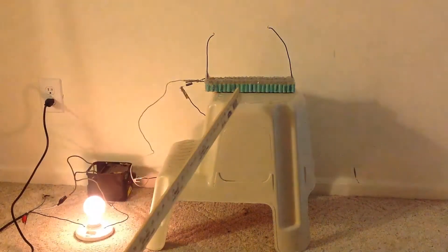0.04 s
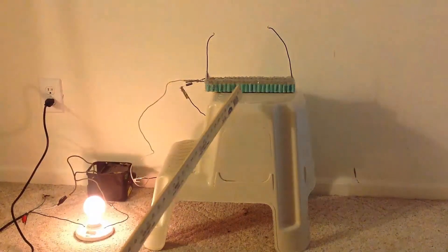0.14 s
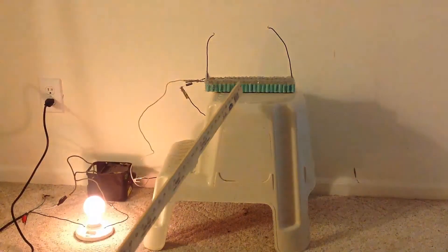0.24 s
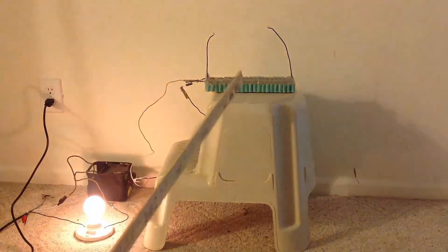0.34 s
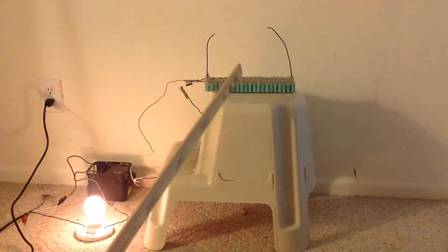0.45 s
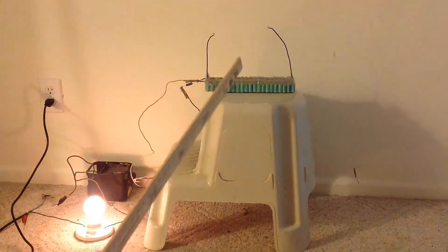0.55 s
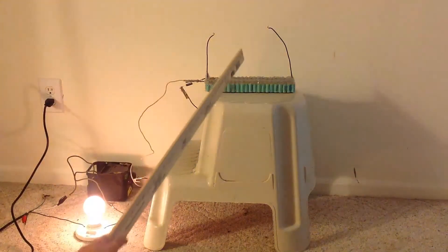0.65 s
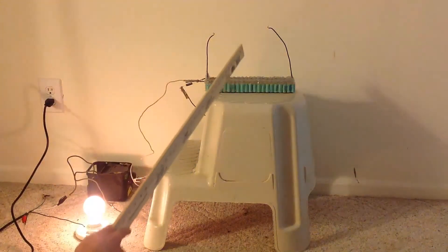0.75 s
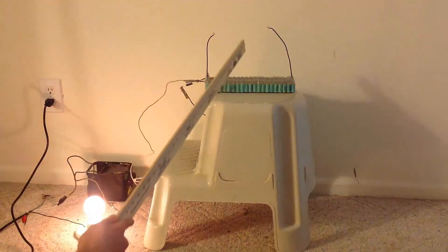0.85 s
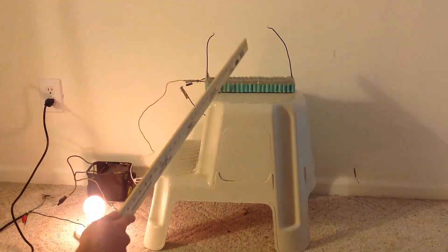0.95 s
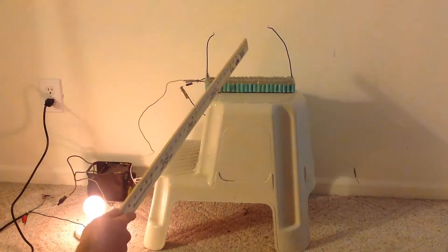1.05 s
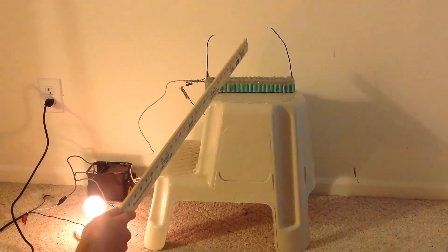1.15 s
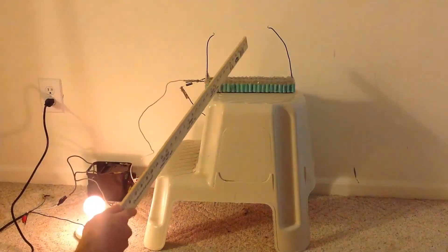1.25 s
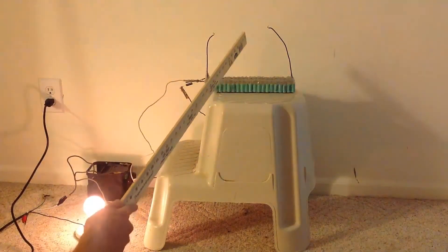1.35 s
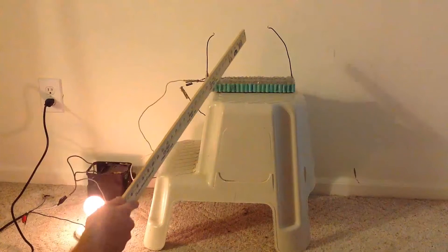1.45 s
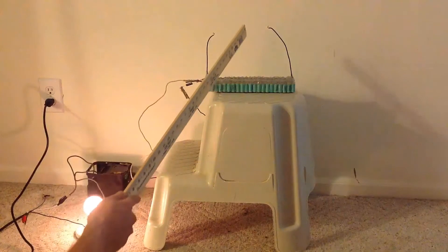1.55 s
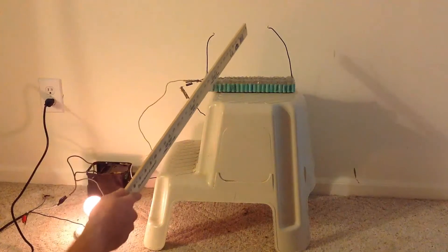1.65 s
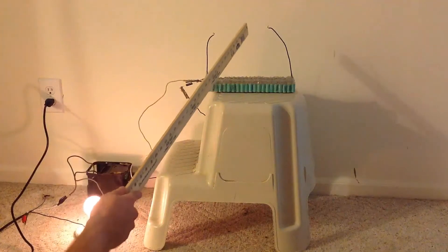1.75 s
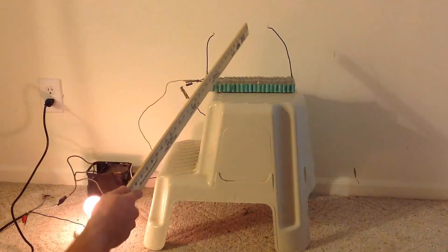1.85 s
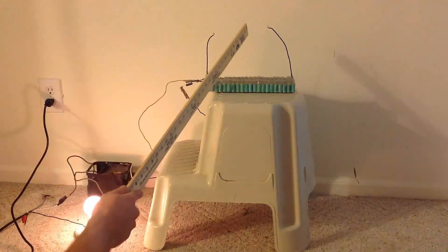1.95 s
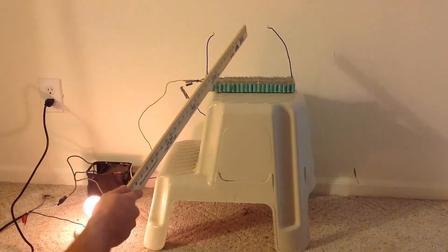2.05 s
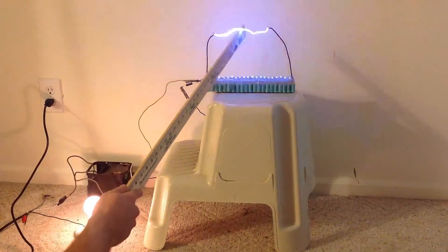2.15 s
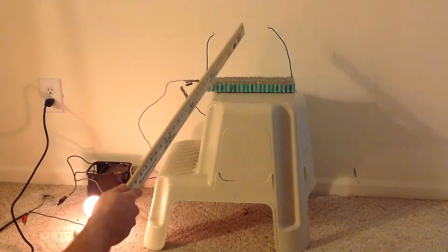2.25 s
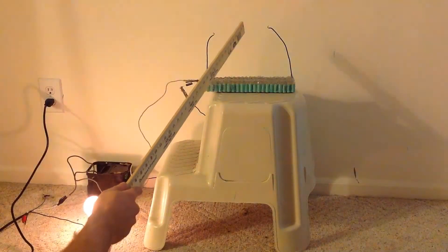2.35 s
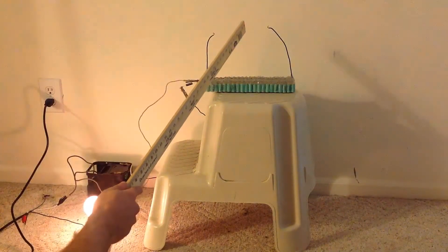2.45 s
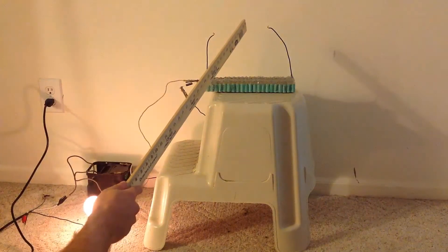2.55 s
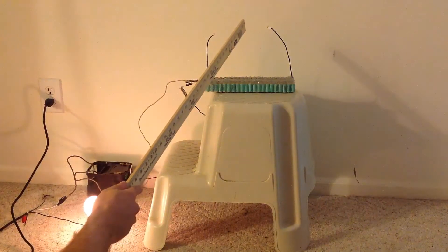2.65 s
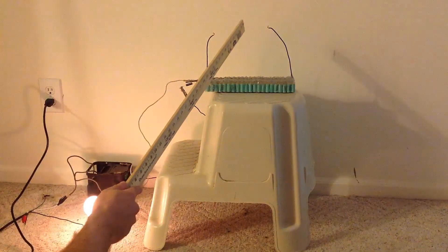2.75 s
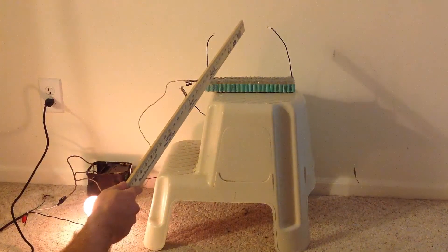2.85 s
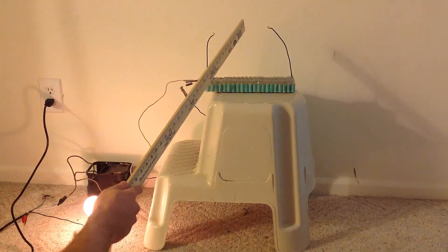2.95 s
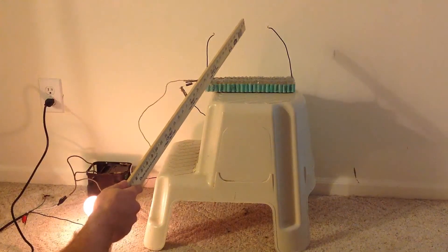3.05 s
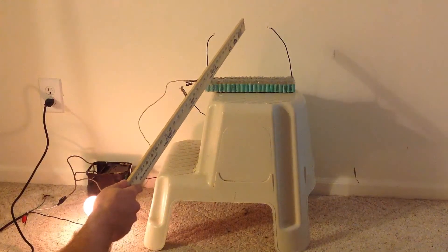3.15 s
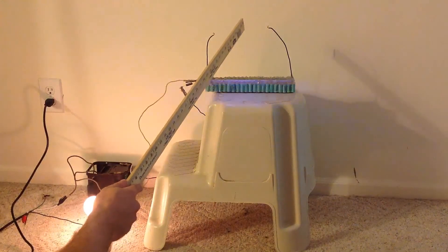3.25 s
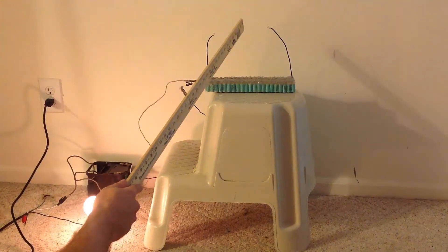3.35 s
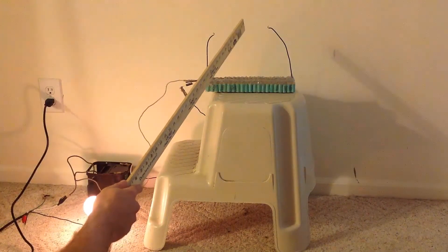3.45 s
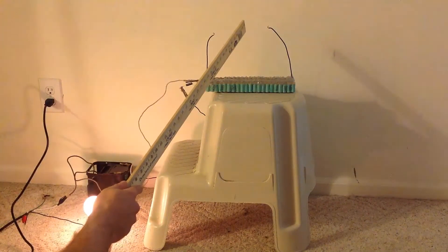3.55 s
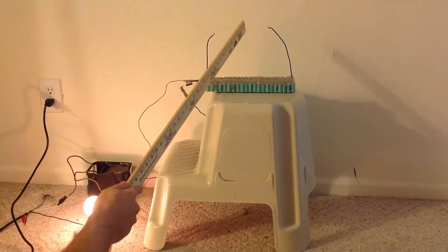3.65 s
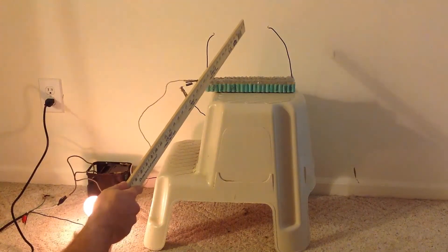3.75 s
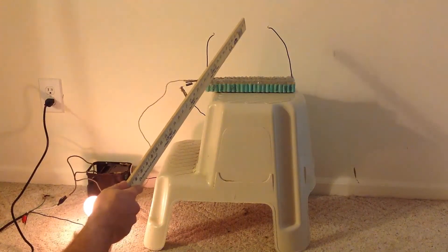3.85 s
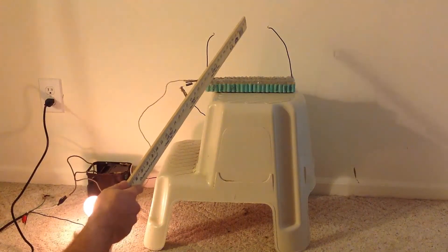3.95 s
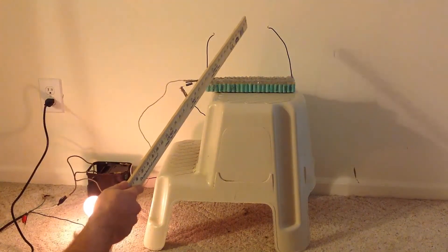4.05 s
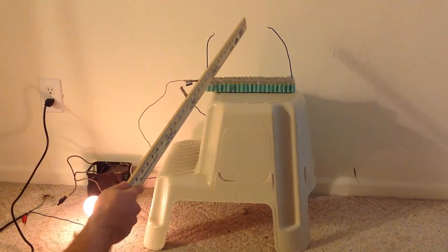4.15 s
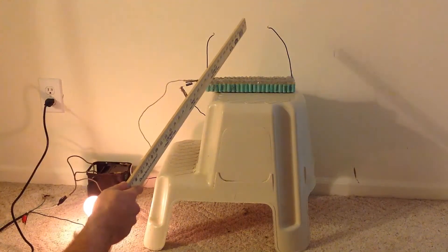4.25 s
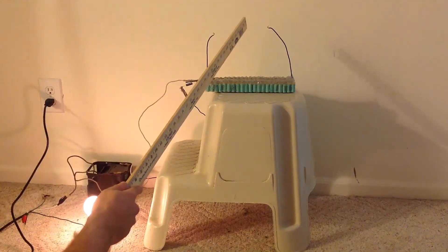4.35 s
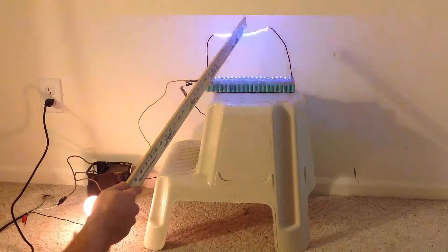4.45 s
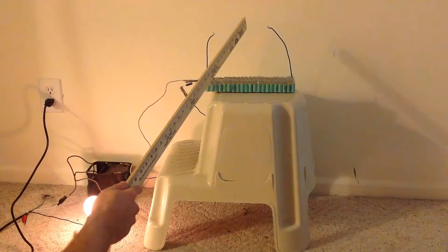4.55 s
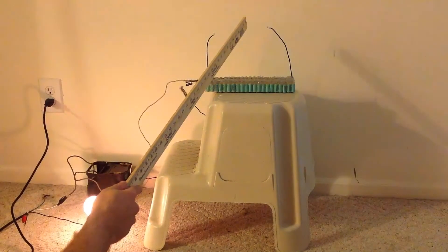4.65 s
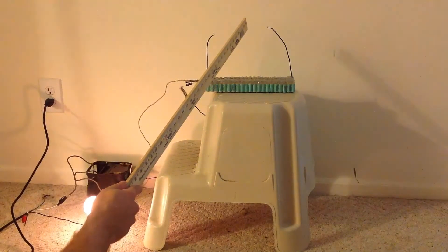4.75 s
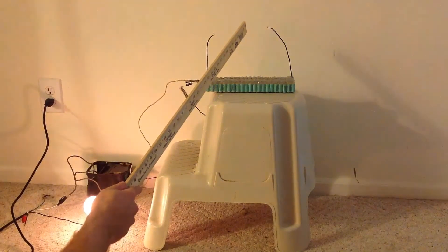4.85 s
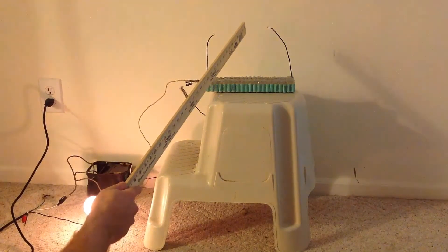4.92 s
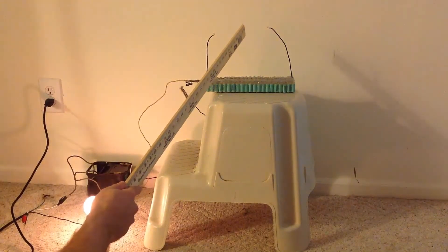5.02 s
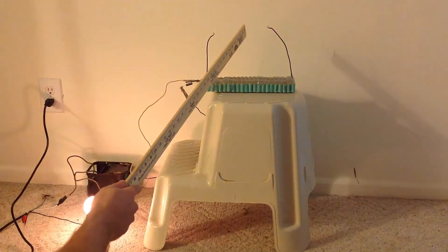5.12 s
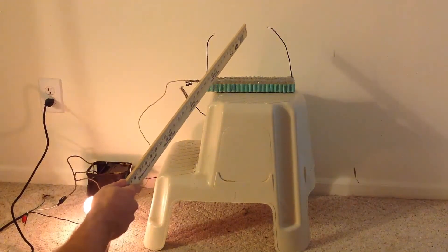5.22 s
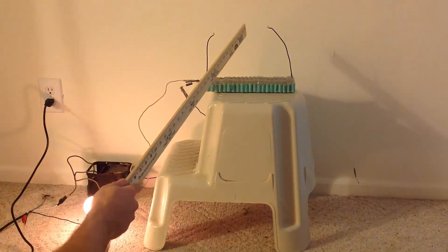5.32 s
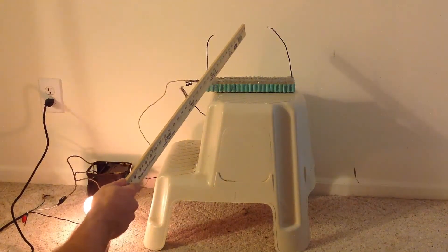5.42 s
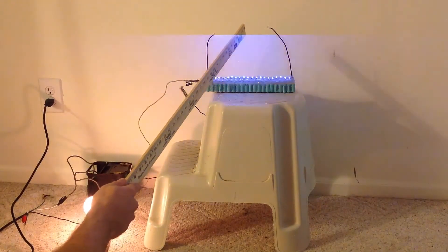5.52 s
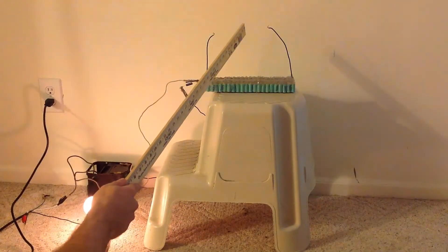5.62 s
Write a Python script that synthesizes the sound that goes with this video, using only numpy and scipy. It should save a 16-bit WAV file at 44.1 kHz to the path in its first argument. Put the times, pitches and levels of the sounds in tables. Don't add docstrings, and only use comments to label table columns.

```python
import sys
import numpy as np
from scipy import signal
from scipy.io import wavfile
from scipy.ndimage import uniform_filter1d

SR = 44100
rng = np.random.default_rng(int(sys.argv[2]) if len(sys.argv) > 2 else 0)


def linear_from_db(decibels):
    return 10 ** (np.asarray(decibels, float) / 20)


def generate_wav(sig):
    pcm = np.round(np.clip(np.atleast_2d(sig).T, -1, 1) * 32767).astype(np.int16)
    wavfile.write(sys.argv[1], SR, pcm)


N = 250488
LEAD = SR // 4

# (time [s], level [dB], reflection level [dB], near scatter [dB])
SPARKS = [
    (-.1104, 0.5, 1, 0),
    (1.0576, 1, -2.5, -2.5),
    (2.1943, 1.4, 2.5, -7.5),
    (3.3099, 0.5, -4, -1.5),
    (4.5105, 1, 0, -0.5),
    (5.596, 0, -6, -3),
]
KNOCK_MS = [.7, 1.8, 6.9, 12.1, 21.3]
KNOCKS = [
    (0.33, -0.73, -0.5, 0.009, 0.19),
    (.5, 0.028, .33, -0.062, 0.2),
    (-0.33, 1.5, -.6, -0.57, 0.24),
    (0.37, -0.63, 1.3, 0.21, .6),
    (-1, 0.42, .15, -0.033, 0.13),
]

LOW_PATHS_MS = [0, 4.75, 9.8, 19.75, 36.55, 60.1]
HIGH_PATHS_MS = [11.9, 23.31, 28.78, 78.78, 104.01, 106.92, 116.6]
# (delay [ms], level [dB])
FAR_PATHS = [(150.54, -26), (156.89, -22), (168.1, -24.5), (174.2, -30)]
FAR_LONE_MS, FAR_LONE_DB = 186.98, -30
FAR_FLOOR_GAIN_DB, FAR_REPEAT_DB = 3.3, -7
FLOOR_LAG_MS, FLOOR_GAIN_DB = 1.38, 1.2
FLUTTER_START_MS, FLUTTER_MS = 46.4, 43.25
WALL_DB, FADE_DB_PER_MS = -2.6, .17
ECHO_DB = 4.5

BURST_MS = [0, 1.45, 6.15, 10.1, 21.1]
BURST_DB = [-0.5, -16.5, -1.5, -9.5, -10.5]
BURST_S = 0.0014

# (frequency [Hz], density [dB per Hz])
TAIL = [(180, -28), (300, -15), (500, -15.5), (900, -4), (1400, -14), (2700, -5.5), (4600, -6.5),
        (8000, -3), (12000, 1.5), (15300, 3.5)]
# (frequency [Hz], T60 [s])
TAIL_T60 = [(300, 0.37), (700, 0.21), (1400, 0.44), (2700, 0.42), (4000, 0.55), (7000, 0.46), (11000, 0.36),
            (15000, 0.25)]
# (frequency [Hz], width [Hz], level [dB])
LINGER = [(864, 120, -9.5), (1580, 210, -6), (2250, 240, -5), (3940, 250, -6.5), (4500, 240, -1),
          (5600, 460, -2.5), (6800, 430, -6)]
TAIL_DB, LINGER_DB, LINGER_T60_S = -12.5, -31.5, .6
GRAIN_DB, GRAIN_S, GRAIN_FADE_S, GRAIN_HZ = 3.2, .0004, .12, 700

# (start [s], length [s], pitch [Hz], level [dB])
SLIPS = [
    (1.622, .052, 362, -53.5),
    (1.674, .056, 332, -52.5),
    (1.72, .06, 345, -60),
]
SAG_HZ_PER_S = [800, 250, 250]
SQUEAK_S, SQUEAK_DB, SQUEAK_FADE_DB_PER_S = 1.68, -64, 210

DIP_DB, RECOVERY_S, HISS_DIP_SHARE = -16, 0.75, 0.8

# (frequency [Hz], level [dB rms])
HUM = [(240, -65), (278.6, -69), (360, -72), (557.2, -67), (835.8, -70), (1114.4, -71), (1393, -80)]
# (frequency [Hz], width [Hz], level [dB rms])
DRONE = [(99, 3, -75), (168, 20, -74), (457, 30, -73), (655, 40, -68), (952, 15, -77)]
# (frequency [Hz], density [dB per Hz])
RUMBLE = [(29, -67), (50, -39.5), (87, -10.5), (209, -4), (238, -6), (419, -12), (552, -8.5), (768, -13.5),
          (827, -12), (1170, -13.5), (4000, -21.5), (5200, -57.5), (8800, -120)]
# (frequency [Hz], density [dB per Hz])
HISS = [(1500, -25), (2500, -4.5), (5000, 1), (10000, -1.5), (15500, -3.5)]
RUMBLE_DB, HUM_DB, HISS_DB = -53, 5.0, -58


def cracks():
    size = int(.62 * SR)
    out = np.zeros(N + LEAD + SR)
    delay_ms, level_db = echoes()
    path_db = rng.normal(0, 1.5, (len(SPARKS), len(delay_ms)))
    for k, (tail, burst) in enumerate(zip(diffuse(size), scatter(size))):
        start_s, crack_db, reflect_db, near_db = SPARKS[k]
        clicks = np.zeros(size)
        clicks[(delay_ms * SR / 1000).astype(int)] = linear_from_db(level_db + path_db[k] + reflect_db + ECHO_DB)
        shock = np.convolve(clicks, [.5, 1, .3, -.8, -.7, -.2])[:size]
        shock = shaped(shock, 2, 5100, "high")
        burst[:15] += 1.2 * np.hanning(15)
        at = LEAD + round(start_s * SR)
        out[at:at + size] += linear_from_db(crack_db) * (shock + tail + linear_from_db(near_db) * burst)
    return out[LEAD:LEAD + N]


def overload_knocks():
    width_s, swing_hz = 0.0014, 165
    shifts = np.zeros(N + SR) + 1e-18
    for (start_s, *_), sizes in zip(SPARKS[1:], KNOCKS):
        times_s = start_s + np.array(KNOCK_MS) / 1000 - width_s / 2
        shifts[np.round(times_s * SR).astype(int)] = sizes
    bumps = np.convolve(shifts, np.hanning(round(width_s * SR)))[:N]
    swing_back = shaped(bumps, 1, [swing_hz / 1.4, swing_hz * 1.4], "band")
    bumps = bumps + linear_from_db(-3) * swing_back
    leak = linear_from_db(-21) * shaped(bumps, 1, 150, "low")
    return shaped(bumps, 4, 120, "high") + leak


def scatter(size):
    ages = np.arange(size) / SR - np.array(BURST_MS)[:, None] / 1000
    decays = (ages >= 0) * np.exp(-np.abs(ages) / BURST_S)
    envelope = np.sum(linear_from_db(BURST_DB)[:, None] * decays, axis=0)
    noise = shaped(rng.standard_normal((len(SPARKS), size)), 2, 1000, "high")
    return envelope * rms_one(shaped(noise, 1, 4400, "low"))


def echoes():
    low = np.array(LOW_PATHS_MS)
    flutter = FLUTTER_START_MS + FLUTTER_MS * np.arange(3)
    near = np.r_[low, HIGH_PATHS_MS, flutter, low + FLOOR_LAG_MS]
    near_db = (WALL_DB - FADE_DB_PER_MS * near) * (near > 0)
    near_db[-len(low) + 1:] += FLOOR_GAIN_DB
    far, far_db = np.transpose(FAR_PATHS)
    far = np.r_[far, far + FLOOR_LAG_MS, FAR_LONE_MS]
    far_db = np.r_[far_db, far_db + FAR_FLOOR_GAIN_DB, FAR_LONE_DB]
    delay_ms = np.r_[near, far, far + FLUTTER_MS]
    level_db = np.r_[near_db, far_db, far_db + FAR_REPEAT_DB]
    order = np.argsort(delay_ms)
    return delay_ms[order], level_db[order]


def diffuse(size):
    same_share = 0.27
    t = np.arange(size) / SR
    shape = (len(SPARKS) + 1, size)
    tails = 0
    for hz, noise in bands(shape, 180):
        tails = tails + linear_from_db(at_hz(TAIL, hz) - 60 * t / at_hz(TAIL_T60, hz)) * noise
    tails = linear_from_db(TAIL_DB) * tails / np.sqrt(np.mean(tails[:, :SR // 30] ** 2))
    white = rng.standard_normal(shape)
    ringing = sum(linear_from_db(db) * resonant(white, hz, width) for hz, width, db in LINGER)
    tails += linear_from_db(LINGER_DB - 60 * t / LINGER_T60_S) * ringing
    tails *= 1 - .45 * np.exp(-(t / 0.0023) ** 4)
    clumps = rms_one(uniform_filter1d(rng.standard_normal(size), round(GRAIN_S * SR)))
    grain = linear_from_db(GRAIN_DB * np.exp(-t / GRAIN_FADE_S) * clumps) - 1
    tails += shaped(tails * grain, 2, GRAIN_HZ, "high")
    return np.sqrt(same_share) * tails[-1] + np.sqrt(1 - same_share) * tails[:-1]


def creak():
    t = np.arange(N) / SR
    out = 0
    for (start_s, length_s, hz, db), sag in zip(SLIPS, SAG_HZ_PER_S):
        age = np.clip(t - start_s, 0, length_s)
        swell = np.sqrt(2) * linear_from_db(db) * np.sin(np.pi * age / length_s)
        out = out + swell * np.sin(2 * np.pi * (hz * age - sag * age ** 2 / 2))
    squeak = rms_one(shaped(rng.standard_normal(N), 2, [2900, 3900], "band"))
    return out + linear_from_db(SQUEAK_DB - SQUEAK_FADE_DB_PER_S * abs(t - SQUEAK_S)) * squeak


def gain_dip_db():
    t = np.arange(N) / SR
    starts_s = np.array(SPARKS)[:, 0]
    latest_s = starts_s[np.searchsorted(starts_s, t, "right") - 1]
    return DIP_DB * np.exp(-(t - latest_s) / RECOVERY_S)


def hum():
    t = np.arange(N) / SR
    white = rng.standard_normal(N)
    out = np.zeros(N)
    for hz, db in HUM:
        tone = np.sin(2 * np.pi * (hz * t + rng.random()))
        out += np.sqrt(2) * linear_from_db(db + 2 * drift(3.9)) * tone
    for hz, width, db in DRONE:
        out += linear_from_db(db + 2 * drift(2.7)) * resonant(white, hz, width)
    return out


def rumble_and_hum(dip_db):
    room = linear_from_db(RUMBLE_DB) * steady(RUMBLE, 44.6, patchy_db=1.0) + linear_from_db(HUM_DB) * hum()
    return linear_from_db(dip_db) * shaped(room, 2, 95, "high")


def hiss(dip_db):
    return linear_from_db(HISS_DB + HISS_DIP_SHARE * dip_db) * steady(HISS, 2200, patchy_db=1.5)


def steady(spectrum, low_hz, patchy_db):
    out = np.zeros(N)
    for hz, noise in bands(N, low_hz):
        out += linear_from_db(at_hz(spectrum, hz) + patchy_db * drift(4)) * noise
    return rms_one(out)


def bands(size, low_hz):
    white = rng.standard_normal((2, *np.atleast_1d(size)))
    edges = 17000 / 2 ** np.arange(0, np.log2(17000 / low_hz), 1 / 3)
    out = []
    for k, (high, low) in enumerate(zip(edges, edges[1:])):
        out.append((np.sqrt(low * high), shaped(white[k % 2], 2, [low, high], "band")))
    return out


def resonant(x, hz, width_hz):
    r = np.exp(-np.pi * width_hz / SR)
    poles = [1, -2 * r * np.cos(2 * np.pi * hz / SR), r * r]
    return rms_one(signal.lfilter([1, 0, -1], poles, x))


def drift(rate_hz):
    knots = rng.standard_normal(400)
    return np.interp(np.arange(N) / SR * rate_hz, np.arange(400), knots)


def shaped(x, order, hz, kind):
    return signal.sosfilt(signal.butter(order, hz, kind, fs=SR, output="sos"), x)


def rms_one(x):
    return x / np.sqrt(np.mean(x ** 2) + 1e-20)


def at_hz(points, hz):
    table_hz, values = np.transpose(points)
    return np.interp(np.log(hz), np.log(table_hz), values)


def scene():
    dip_db = gain_dip_db()
    background = rumble_and_hum(dip_db) + hiss(dip_db)
    return (cracks() + overload_knocks() + creak() + background)[None]


def low_pass(x):
    return signal.sosfilt(signal.butter(12, 16430, fs=SR, output="sos"), x)


def record(dry):
    clipped = np.clip(dry, -1.05, 1.05)
    cut = signal.sosfilt(signal.cheby2(18, 50, 15600, fs=SR, output="sos"), clipped)
    mix = np.clip(cut, -1, 1)
    return low_pass(mix)


dry = scene()
out = record(dry)
generate_wav(out)
```